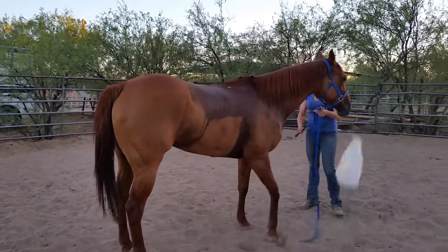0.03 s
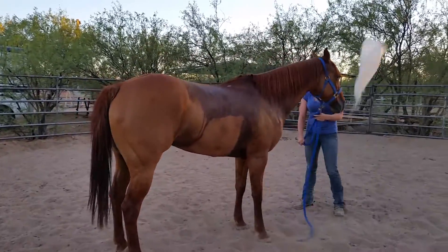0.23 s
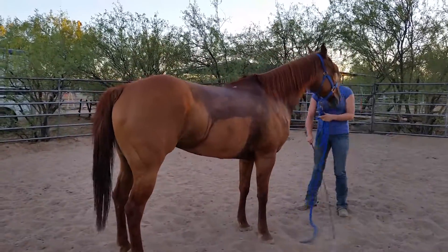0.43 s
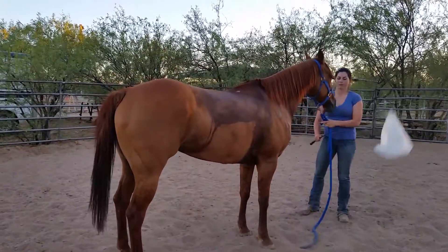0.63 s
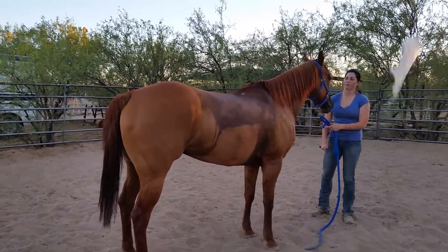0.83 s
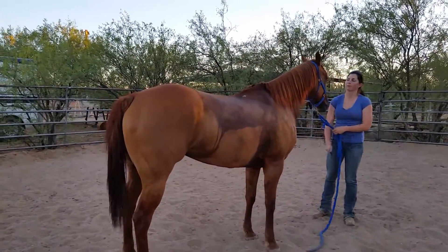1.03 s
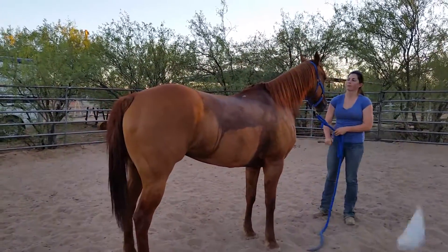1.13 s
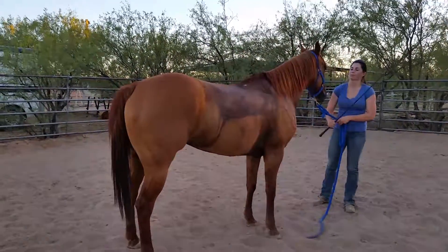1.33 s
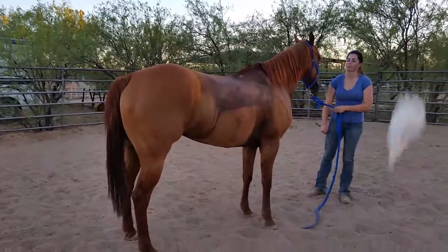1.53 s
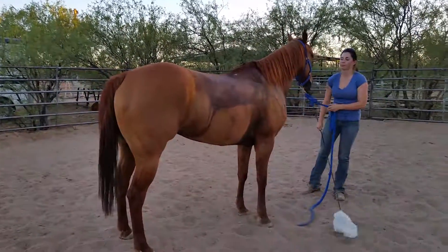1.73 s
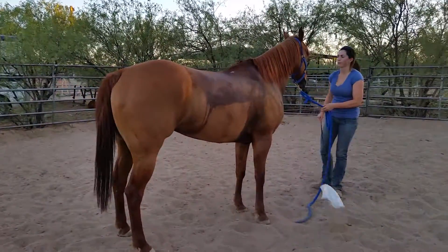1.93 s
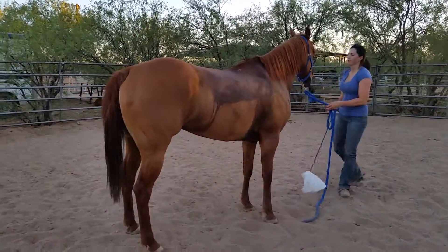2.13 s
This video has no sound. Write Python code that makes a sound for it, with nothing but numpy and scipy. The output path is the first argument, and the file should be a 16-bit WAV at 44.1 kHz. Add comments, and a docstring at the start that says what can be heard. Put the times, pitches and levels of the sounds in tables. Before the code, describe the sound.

A plastic bag is whipped around in an outdoor pen, crackling in uneven surges with flaps and sharp snaps. Light wind rumbles on the microphone, whose right side is muffled and faintly rubbed and bumped.

```python
"""A plastic bag is whipped round in an outdoor pen: its film crackles densely, billows and snaps taut.
The open left microphone port hears it directly. The right port is covered, most likely by a finger,
which muffles that side and rubs and bumps on it. Air buffets both ports with a light rumble,
and a thin hiss lies far behind."""
import sys
import numpy as np
from scipy import signal
from scipy.fft import rfft, irfft
from scipy.io import wavfile

SR = 44100
rng = np.random.default_rng(int(sys.argv[2]) if len(sys.argv) > 2 else 0)


def master(y):
    """Save y as 16-bit WAV."""
    cut = np.clip(np.atleast_2d(y).T, -1, 1)
    pcm = np.round(cut * 32767)  # scale
    wavfile.write(sys.argv[1], SR, pcm.astype(np.int16))


N = 97020
TIME = np.arange(N) / SR

# Far hiss at each port, and the rumble of air on both. Each row: frequency in Hz, relative level in dB.
LEFT_HISS_COLOUR = [(100, 6), (220, 6), (550, -5), (1100, -13.5), (1900, -9), (2800, -14), (3400, -10.5),
                    (4100, -4), (4700, -1), (5400, -7.5), (6200, -14.5), (8000, -22), (10000, -38),
                    (12000, -22), (15500, -28)]
RIGHT_HISS_COLOUR = [(100, 6), (400, 4), (700, 2), (2000, -4.5), (4000, -10), (8500, -23), (12000, -13),
                     (15500, -9.5)]
RUMBLE_COLOUR = [(15, -6), (45, -2.5), (90, -1.5), (140, -6.5), (220, -15), (350, -26.5), (700, -44.5),
                 (2000, -68)]
# Air buffeting the ports through the swings. Each row: time in seconds, gain in dB.
BUFFET_GAIN = [(0, -7), (.28, -4), (.55, 0), (.7, -0.5), (.9, 0), (1.16, 3.5), (1.4, 1.5), (1.62, -1),
               (1.85, 1.5), (2.0, -2.5), (2.15, -0.5)]

# Loss through the covered right port. Each row: frequency in Hz, gain in dB.
COVERED_PORT = [(60, -5), (200, -24), (400, -15.5), (620, -21.5), (950, -23), (2000, -24), (3200, -20.5),
                (5000, -32), (6300, -31.5), (8000, -29.5), (10000, -19), (12000, -19.5), (15500, -19)]
# The finger slips. Each row: start and length in seconds, slips per second, push in dB, ring in Hz.
FINGER_RUBS = [(.362, 0.12, 108, -32, 181), (1.356, 0.1, 55, -32.5, 84), (1.828, .135, 37, -33, 101)]
# It bumps the microphone housing. Each row: start in seconds, push in dB, ring in Hz.
FINGER_BUMPS = [(.509, -36, 142), (.837, -34.5, 64), (.899, -36, 160), (1.315, -43, 70), (1.332, -27, 88)]

# How hard the bag rustles through the swings. Each row: time in seconds, drive in dB.
RUSTLE_DRIVE = [(0.0, -63.5), (0.048, -64.5), (0.056, -68.7), (0.1, -63), (0.128, -50), (0.182, -56),
                (0.208, -49.5), (0.251, -54), (0.265, -51.5), (0.273, -56.5), (0.317, -58.4),
                (0.339, -51.5), (0.351, -39.5), (0.407, -44), (0.471, -43.5), (0.483, -45.5), (0.499, -39),
                (0.535, -45.0), (0.559, -43.5), (0.565, -50.5), (0.591, -52.4), (0.605, -46.5),
                (0.615, -49), (0.655, -35), (0.676, -48), (0.692, -48), (0.722, -48.5), (0.736, -43.1),
                (0.746, -48.5), (0.78, -50), (0.806, -44.5), (0.83, -46.5), (0.838, -47.5), (0.896, -59.5),
                (0.926, -55.6), (0.94, -40.5), (0.954, -38.5), (0.978, -48), (1.032, -44.5), (1.04, -48.5),
                (1.109, -42), (1.133, -35), (1.145, -44.5), (1.179, -57), (1.207, -56.7), (1.233, -40.5),
                (1.261, -39), (1.295, -52), (1.373, -48.5), (1.393, -41), (1.409, -48.5), (1.451, -51.5),
                (1.485, -57.5), (1.537, -60.5), (1.57, -41.5), (1.576, -44.5), (1.61, -48), (1.616, -43),
                (1.638, -48.5), (1.65, -42.5), (1.678, -39), (1.738, -52), (1.758, -45.5), (1.798, -48.5),
                (1.816, -47), (1.86, -54), (1.868, -51), (1.894, -55.5), (1.952, -59.5), (1.956, -62.5),
                (2.169, -65), (2.199, -68.4)]
# Treble and billowing, each against the rustle. Each row: time in seconds, gain in dB.
TREBLE_GAIN = [(.1, 1), (.28, 3), (.36, 1), (.52, 3), (.65, 3), (.82, 3.5), (.95, -1), (1.13, 1),
               (1.26, 0.5), (1.4, -1), (1.57, -2), (1.68, 1), (1.8, 3.5), (1.95, -0.5)]
BILLOW_GAIN = [(.1, -8.5), (.37, -10), (.43, -8), (.5, -8), (.545, -6), (.65, -10.5), (.75, -13.5),
               (.83, -9), (.95, -10), (1.02, -14), (1.08, -16), (1.11, -5), (1.135, -2.5), (1.165, -7),
               (1.25, -5.5), (1.3, -14), (1.39, -10.5), (1.57, -15), (1.68, -7), (1.85, -12)]
# The crackling film and the billowing body. Each row: frequency in Hz, relative level in dB.
FILM_COLOUR = [(150, -26), (450, -1.5), (620, -6.5), (780, -0.5), (930, 3.5), (1300, -3), (2000, -0.5),
               (2900, -2), (4500, 0.5), (6500, 1.5), (7700, -2.5), (8700, -9.5), (10000, -14), (12000, -10),
               (14500, -8), (16000, -10)]
BODY_COLOUR = [(30, -15.5), (90, -4.5), (200, -2), (340, 0.5), (430, -4.5), (600, -14), (1000, -39.5),
               (3000, -48.5)]
# A crease gives way in a bright crack. Each row: start in seconds, level in dB.
CREASE_CRACKS = [(0.354, -40), (0.652, -29), (0.658, -28), (0.94, -24), (0.951, -36), (1.131, -23),
                 (1.567, -27), (1.648, -40), (1.693, -33), (1.759, -32)]
# The bag fills and flaps; a fold snaps taut. Each row: start in seconds, push in dB, ring in Hz.
BAG_FLAPS = [(.5435, -19.5, 255), (.938, -35, 258), (.95, -29.5, 326), (1.007, -31, 278),
             (1.023, -28.5, 396), (1.1085, -19, 380), (1.1294, -26.5, 340), (1.1322, -16.5, 327),
             (1.243, -21.5, 314), (1.258, -29, 280)]
FOLD_SNAPS = [(.4248, -17, 1110), (.5437, -26, 1120), (.808, -23.5, 930), (.829, -25.5, 850),
              (1.565, -30, 940), (1.617, -23.5, 970), (1.625, -24, 960)]
# Snaps come back off the ground and rails of the pen. Each row: delay in seconds, gain in dB.
PEN_ECHOES = [(.0025, -9.5), (.0095, -21)]

CREASES_PER_S, CRINKLES_PER_S, CREASE_SPREAD_DB = 9000, 450, 3
CREASE_SHARE, CRINKLE_SHARE, RUSH_SHARE = 0.52, 0.13, 0.35  # shares of the power
FILM_GAIN_DB, BODY_GAIN_DB, REST_DB = 6.5, 6, -63.5
FLUTTER_HZ, FLUTTER_DB, SHIMMER_HZ, SHIMMER_DB = 125, 0.66, 22, 1.5
TREBLE_FROM_HZ, CUTOFF_HZ = 8500, 15800


def from_db(db):
    """Decibels to gain."""
    return 10 ** (np.asarray(db) / 20)


def unit_rms(x):
    """Scale to an rms of 1."""
    return x / np.sqrt(np.mean(x ** 2) + 1e-20)


def in_time(rows):
    """Join (seconds, value) rows by straight lines."""
    return np.interp(TIME, *np.transpose(rows))


def drift(hz):
    """Smooth random wander of rms 1, mostly slower than hz."""
    pole = np.exp(-2 * np.pi * hz / SR)
    wander = signal.lfilter([1], [1, -2 * pole, pole * pole], rng.standard_normal(2 * N))
    return unit_rms(wander[N:])


def in_frequency(hz, values):
    """Join values along log frequency, over the bins of a 2N-point spectrum."""
    bins_hz = np.arange(N + 1) * SR / (2 * N)
    return np.interp(np.log(bins_hz + 1), np.log(hz), values)


def colour(x, points):
    """Causal (minimum-phase) filter through (Hz, dB) points."""
    hz, db = np.transpose(points)
    cepstrum = irfft(np.log(from_db(in_frequency(hz, db))))
    cepstrum[1:N] *= 2
    cepstrum[N + 1:] = 0
    return irfft(rfft(x, 2 * N) * np.exp(rfft(cepstrum)))[:N]


def ring(times, gains, hz, t60_s, soft_hz):
    """Pushes set one damped resonance ringing; a low-pass softens them."""
    pushes = np.zeros(N)
    np.add.at(pushes, (np.asarray(times) * SR).astype(int), gains)
    radius, angle = from_db(-60 / (t60_s * SR)), 2 * np.pi * hz / SR
    ringing = signal.lfilter([0, np.sin(angle)], [1, -2 * radius * np.cos(angle), radius ** 2], pushes)
    return signal.sosfilt(signal.butter(2, soft_hz, fs=SR, output="sos"), ringing)


def knocks(rows, t60_s, soft_hz):
    """One ringing push for each (seconds, dB, Hz) row."""
    return sum(ring([start], from_db(db), hz, t60_s, soft_hz) for start, db, hz in rows)


def air(hiss_colour, hiss_db, rumble_db):
    """Steady hiss from far off, and air buffeting unevenly right at one port."""
    hiss = unit_rms(colour(rng.standard_normal(N), hiss_colour))
    rumble = unit_rms(colour(rng.standard_normal(N), RUMBLE_COLOUR))
    return from_db(hiss_db) * hiss + from_db(rumble_db + in_time(BUFFET_GAIN)) * rumble


def finger():
    """On the microphone itself: soft bumps, and stick-slip judders that swell and fade."""
    out = knocks(FINGER_BUMPS, t60_s=0.082, soft_hz=250)
    for start, length, rate, db, hz in FINGER_RUBS:
        slips = np.arange(int(length * rate) + 1)
        jitter = 0.066 * rng.standard_normal(len(slips))
        times = start + (slips + jitter) / rate
        swell = np.sqrt(np.sin(np.pi * (slips + 0.5) / len(slips)))
        out += ring(times, from_db(db) * swell, hz, t60_s=0.044, soft_hz=250)
    return out


def covered_port(direct, direct_gain=0.35, scatter_s=0.051):
    """Sound reaches the covered port faint, muffled and mostly scattered."""
    tail = rng.standard_normal(N) * np.exp(-TIME / scatter_s)
    scattered = signal.fftconvolve(direct, tail / np.linalg.norm(tail))[:N]
    return colour(direct_gain * direct + np.sqrt(1 - direct_gain ** 2) * scattered, COVERED_PORT)


def buckling(per_s):
    """The film buckles in a shower of tiny clicks of uneven size."""
    sizes = from_db(CREASE_SPREAD_DB * np.minimum(rng.exponential(1, N), 3))
    signs = rng.choice([-1, 1], N)
    return unit_rms(sizes * signs * (rng.random(N) < per_s / SR))


def creases():
    """Dense small creases and sparser, sharper crinkles over a smooth rush of air."""
    dense = np.sqrt(CREASE_SHARE) * buckling(CREASES_PER_S)
    sparse = np.sqrt(CRINKLE_SHARE) * buckling(CRINKLES_PER_S)
    return dense + sparse + np.sqrt(RUSH_SHARE) * rng.standard_normal(N)


def shimmer(x, bands=10):
    """Changing folds favour now one band, now another; the treble has its own slow level."""
    centres_hz = np.geomspace(500, CUTOFF_HZ, bands)
    position = in_frequency(centres_hz, np.arange(bands))
    spectrum, out = rfft(x, 2 * N), np.zeros(N)
    for k, hz in enumerate(centres_hz):
        band = irfft(spectrum * np.maximum(1 - abs(position - k), 0))[:N]
        treble_db = in_time(TREBLE_GAIN) * (hz > TREBLE_FROM_HZ)
        out += band * from_db(SHIMMER_DB * drift(SHIMMER_HZ) + treble_db)
    return out


def film_crackle(drive, crack_decay_s=0.00075):
    """The film crackles with the swings and flares briefly where a crease gives way."""
    cracks = sum(from_db(db) * (TIME >= start) * np.exp(-abs(TIME - start) / crack_decay_s)
                 for start, db in CREASE_CRACKS)
    envelope = np.hypot(from_db(FILM_GAIN_DB) * drive, cracks)
    return envelope * shimmer(unit_rms(colour(creases(), FILM_COLOUR)))


def billow(drive):
    """The body of the bag billows, low under the crackle."""
    envelope = drive * from_db(BODY_GAIN_DB + in_time(BILLOW_GAIN))
    return envelope * unit_rms(colour(creases(), BODY_COLOUR))


def snaps():
    """Folds snap taut; the nearby ground and rails throw the sound back."""
    direct = knocks(FOLD_SNAPS, t60_s=0.0044, soft_hz=3500)
    echoes = sum(from_db(db) * np.interp(TIME - delay, TIME, direct, left=0) for delay, db in PEN_ECHOES)
    return direct + echoes


def bag():
    """Film and body flutter together as the bag whips round; flaps and snaps stand out of them."""
    flutter = from_db(FLUTTER_DB * drift(FLUTTER_HZ))
    power = from_db(in_time(RUSTLE_DRIVE)) ** 2 - from_db(REST_DB) ** 2
    drive = np.sqrt(np.maximum(power, 0))  # no rustle at or below REST_DB
    flaps = knocks(BAG_FLAPS, t60_s=0.014, soft_hz=1510)
    return flutter * (film_crackle(drive) + billow(drive)) + flaps + snaps()


def scene():
    """In the pen: the left port is open to the bag, the right one lies under the finger."""
    direct = bag()
    muffled = covered_port(direct)
    left = direct + air(LEFT_HISS_COLOUR, hiss_db=-55, rumble_db=-48.5)
    right = muffled + finger() + air(RIGHT_HISS_COLOUR, hiss_db=-65.5, rumble_db=-54)
    return np.array([left, right])


def record(dry):
    """The top is cut steeply on both channels."""
    return signal.sosfilt(signal.ellip(12, 0.1, 80, CUTOFF_HZ, fs=SR, output="sos"), dry)


dry = scene()
out = record(dry)
master(out)
```